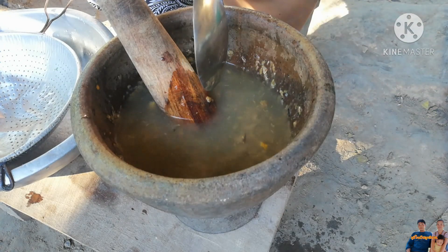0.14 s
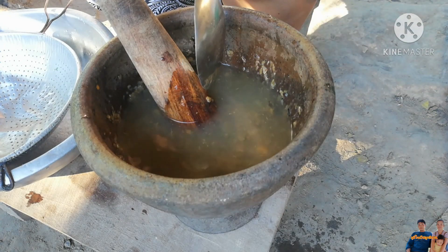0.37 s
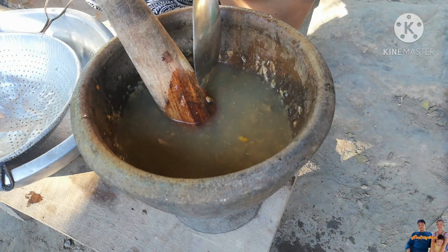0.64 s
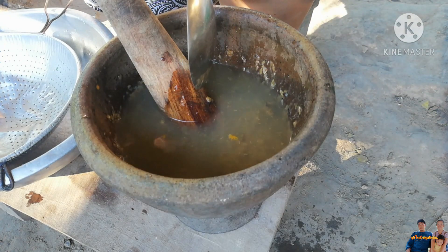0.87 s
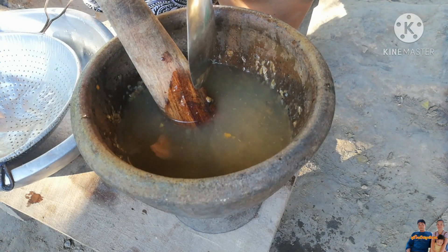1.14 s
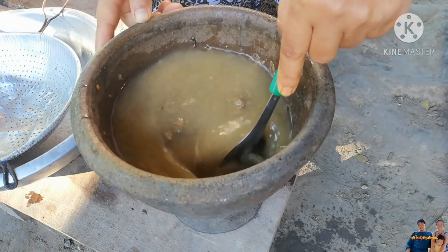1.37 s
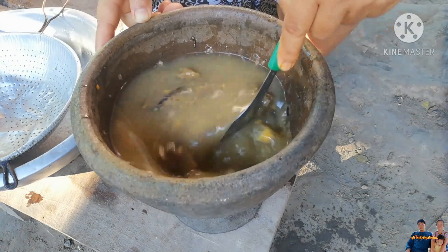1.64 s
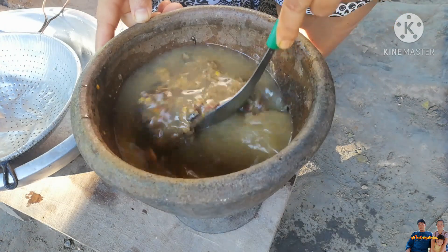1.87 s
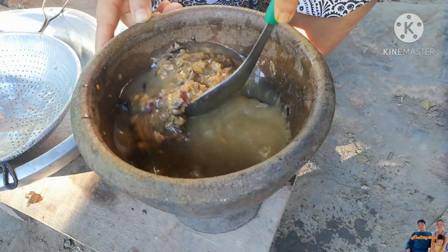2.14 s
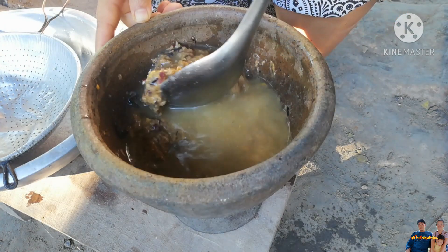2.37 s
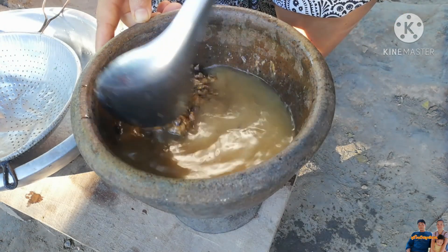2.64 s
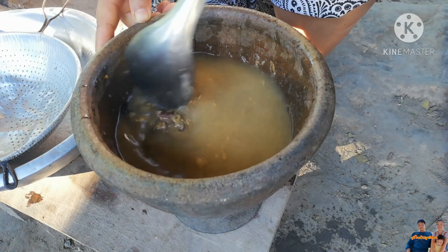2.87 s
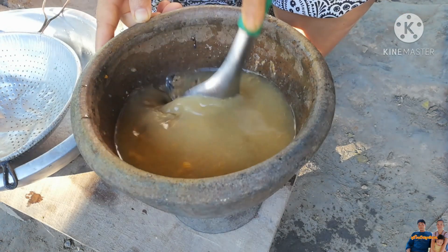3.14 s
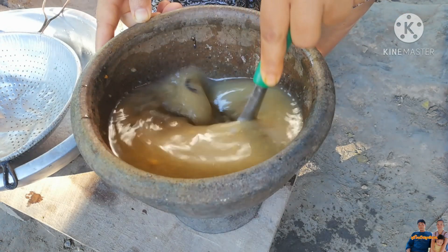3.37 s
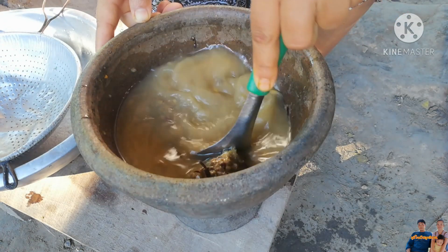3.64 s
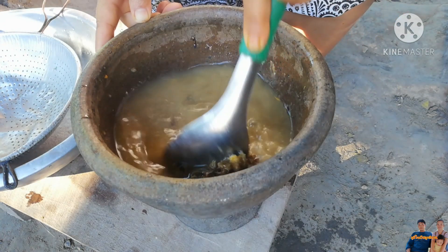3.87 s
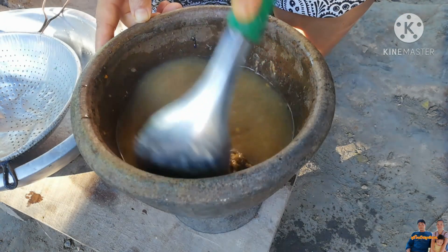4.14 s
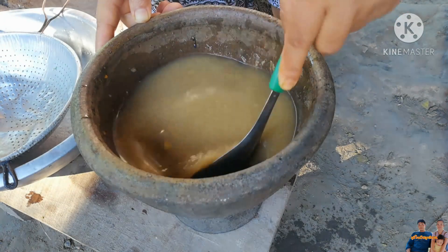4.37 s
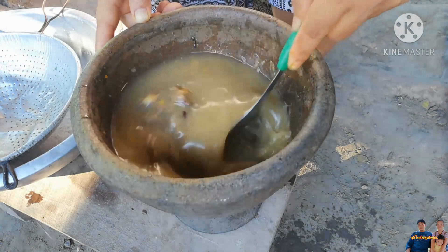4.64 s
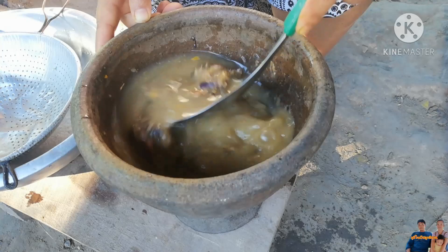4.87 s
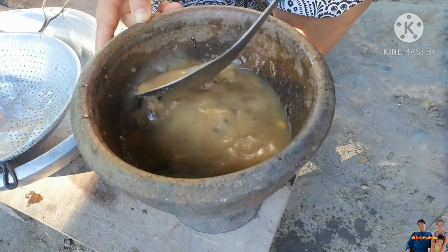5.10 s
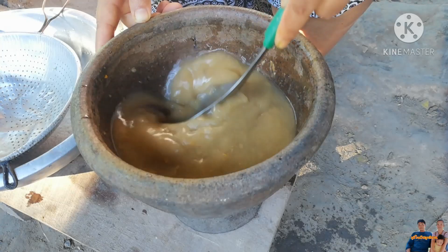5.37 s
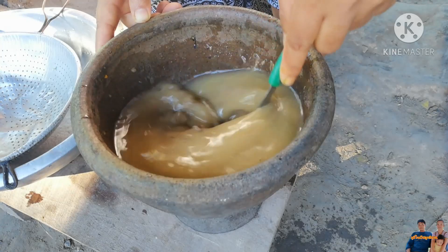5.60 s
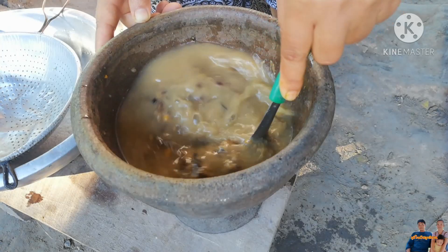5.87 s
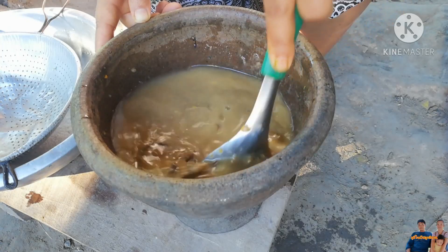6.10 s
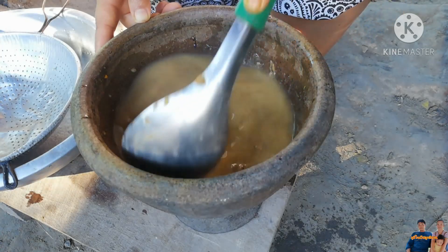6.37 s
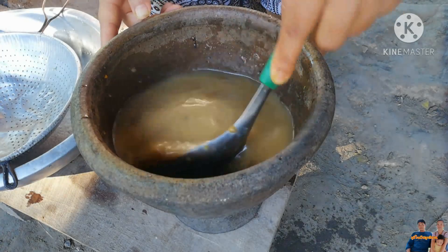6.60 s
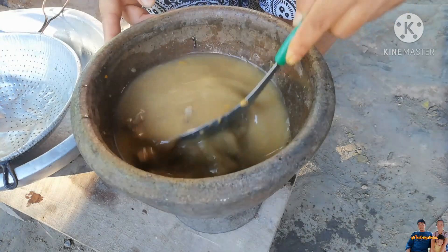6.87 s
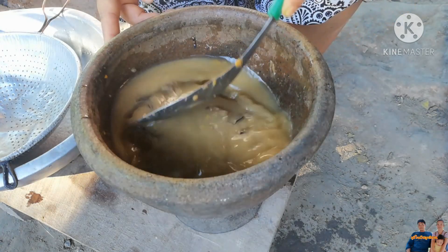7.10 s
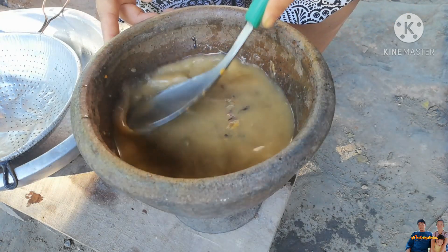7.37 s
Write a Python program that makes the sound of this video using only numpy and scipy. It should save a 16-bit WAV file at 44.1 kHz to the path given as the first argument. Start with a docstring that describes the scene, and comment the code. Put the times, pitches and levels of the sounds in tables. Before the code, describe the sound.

Quiet outdoor hiss and low distant rumble open for about a second. Then a steel spoon begins stirring gritty liquid in a clay mortar: faint rubbing and watery trickles, then a hard bright clink with a cluster of hollow knocks. Irregular scrapes, ticks, plops and gurgles follow in bursts, then thin out. Soft broom-like swishes and a faraway rooster sit behind. Close stereo microphone, dry open yard.

```python
"""Spoon in a clay mortar

A steel spoon stirs gritty liquid in a clay mortar outdoors. Random jolts and noise through the ringing of
clay and steel make it grate; clicks and dying tones make it tick and knock. The liquid plops and drips in
short climbing tones and surges in low noise. Behind it swept noise swishes like a broom, a far cock crows
in wavering tones, a low hum swells once, and shaped noise rumbles and hisses. Two close microphone ports hear it.
"""
import sys
import numpy as np
from scipy import signal
from scipy.fft import rfft, irfft, next_fast_len
from scipy.io import wavfile
from scipy.ndimage import uniform_filter1d, map_coordinates

SR = 44100
rng = np.random.default_rng(int(sys.argv[2]) if len(sys.argv) > 2 else 0)


def makeup_ratio(level_db):
    """Linear amplitude ratio for a level in decibels (20 dB per factor of ten)."""
    decades = np.asarray(level_db, float) / 20
    return 10 ** decades


def dump(signal):
    """Clip the signal to [-1, 1] and save it as 16-bit WAV at the path in sys.argv[1]."""
    limited = np.clip(np.atleast_2d(signal).T, -1, 1)
    pcm = np.round(limited * 32767).astype(np.int16)
    wavfile.write(sys.argv[1], SR, pcm)


N = 330309  # length of the scene in samples


def unit(x):
    """Brings x to rms 1."""
    return x / np.sqrt(np.mean(x ** 2) + 1e-20)


def along(points, hz):
    """Reads a curve of (Hz, value) points on a log frequency axis."""
    point_hz, value = np.transpose(points)
    return np.interp(np.log(hz + 1), np.log(point_hz + 1), value)


def wobble(rate):
    """A smooth random curve with rate knots a second."""
    knots = rng.standard_normal(int(N * rate / SR) + 4)
    return map_coordinates(knots, [np.arange(N) * rate / SR])


def filtered(x, response):
    """Passes x through a filter given as a (complex) function of frequency."""
    m = next_fast_len(N + SR // 4)
    return irfft(rfft(x, m) * response(np.fft.rfftfreq(m, 1 / SR)), m)[..., :N]


def resonances(table):
    """A sum of resonances, each a hump at its own frequency; every second one is turned upside down."""
    def response(hz):
        total = 0
        for k, (center, width, db) in enumerate(table):
            spread = 1j * hz * width
            total = total + (-1) ** k * makeup_ratio(db) * spread / (center * center - hz * hz + spread)
        return total
    return response


def rings(s, db, hz, t60, rise, attack, size):
    """Dying tones, one a row: 60 dB down after t60, by when the pitch has climbed by twice the share rise."""
    t = np.arange(size) / SR
    hz, t60 = hz[:, None], t60[:, None]
    tone = np.sin(2 * np.pi * hz * t * (1 + rise * t / t60))
    wave = tone * makeup_ratio(db[:, None] - 60 * t / t60) * (1 - np.exp(-t / attack))
    at = np.round(s * SR).astype(int)[:, None] + np.arange(size)
    return np.bincount(at.ravel(), wave.ravel(), N + size)[:N]


def glide(rows, shape):
    """Start sample, arched level and sliding pitch of each (s, length s, start Hz, end Hz, dB) row."""
    for s, length, start_hz, end_hz, db in rows:
        u = np.arange(int(length * SR)) / (length * SR)
        yield round(s * SR), makeup_ratio(db) * np.sin(np.pi * u) ** shape, start_hz + (end_hz - start_hz) * u


def tone(hz):
    """A sine that follows a pitch track."""
    return np.sin(2 * np.pi * np.cumsum(hz) / SR)


# strokes along the clay: (time [s], length [s], open wall level [dB], drowned wall level [dB],
# grit level [dB], fall of the grit over the length [dB])
SPOON_STROKES = [(1.168, 0.23, -59, -55, -70, -3), (1.229, 0.051, -54, -64, -51, -1),
                 (1.272, 0.05, -57, -59, -46.5, 12), (1.41, 0.12, -59, -51.5, -55, 3),
                 (1.573, 0.29, -67, -41.5, -88, 20), (2.338, 0.35, -62, -61.5, -78, -30),
                 (2.709, 0.068, -36, -43, -29.5, 30), (2.785, 0.06, -32, -46, -37, -4),
                 (2.817, 0.17, -38.5, -42.5, -31.5, 16.5), (3.066, 0.46, -52, -57.5, -56.5, 9),
                 (3.536, 0.16, -55.5, -63, -59, 11), (3.788, 0.16, -54, -58.5, -61, 27),
                 (4.182, 0.15, -45, -47, -28.5, 19), (4.372, 0.085, -53, -54, -51.5, -4),
                 (4.487, 0.17, -57, -54, -53.5, 2), (4.74, 0.13, -54, -66.5, -49, 10),
                 (5.063, 0.16, -58, -55, -68, 10), (5.293, 0.041, -44.5, -74, -33.5, 20),
                 (5.352, 0.15, -39, -40, -43, -1), (5.53, 0.074, -35, -44.5, -48, -6),
                 (5.63, 0.1, -29, -40, -47, 0.5), (5.767, 0.056, -74, -71, -37.5, 10),
                 (5.81, 0.35, -60, -65, -100, -29), (6.057, 0.24, -58.5, -66, -61, -4.5),
                 (6.369, 0.027, -38, -42.5, -53, 5), (6.472, 0.11, -40, -66, -29, 12.5),
                 (6.597, 0.072, -45.5, -51, -46.5, -6.5), (7.165, 0.024, -65, -78, -48.5, 4),
                 (7.433, 0.09, -54, -54.5, -56, -4)]
# the spoon's edge bounces and chatters over the grit: (time [s], level [dB], time to fall 60 dB [s])
EDGE_CHATTER = [(4.1827, -17, 0.039), (4.1905, -30, 0.014), (4.2006, -15, .04), (4.2085, -27, 0.054),
                (4.2255, -30, .06), (4.238, -36, .08), (4.256, -38, .05), (4.267, -40, 0.045),
                (4.289, -34.5, .1), (4.308, -32, 0.04), (4.326, -57, 0.043), (6.476, -22.5, 0.076),
                (6.4938, -21.5, 0.063), (6.505, -33, 0.054), (6.518, -28, 0.092), (6.54, -36, 0.055),
                (6.552, -45, 0.056), (6.563, -44, 0.04), (6.637, -40, 0.045), (6.646, -47, .05),
                (2.797, -23.5, 0.067), (2.811, -25, .08), (2.8176, -24, 0.041), (2.825, -33, 0.06),
                (2.836, -30, .07), (2.847, -25, 0.096), (2.8726, -32, 0.082), (2.896, -40, 0.046),
                (5.376, -42, .06), (5.455, -35, 0.048), (5.544, -46, 0.052)]
# light touch between strokes: (open wall level [dB], drowned wall level [dB], grit level [dB])
IDLE_TOUCH = (-79, -104, -63)
IDLE_FROM_S = 1.15


def pressure():
    """Gains of open wall, drowned wall and grit: a light idle touch plus every stroke and bounce."""
    bite = np.array([[.12], [.12], [.02]])  # how slowly each swells in, as a share of the stroke length
    lift, ease_db, uneven_db = 0.1, 9.5, 2.5  # lift as a share of the length; the walls ease off on the way
    t = np.arange(N) / SR
    out = makeup_ratio(np.array(IDLE_TOUCH)[:, None] + 0.53 * wobble(7.5)) * (t > IDLE_FROM_S)
    for s, length, wall_db, deep_db, grit_db, fade_db in SPOON_STROKES:
        at = slice(round(s * SR), round((s + 2 * length) * SR))
        u = (t[at] - s) / length
        shape = (1 - np.exp(-u / bite)) * np.exp(-np.maximum(u - 1, 0) / lift)
        level_db = np.array([wall_db - ease_db * u, deep_db - ease_db * u, grit_db - fade_db * u])
        out[:, at] += shape * makeup_ratio(level_db)
    out = out * makeup_ratio(uneven_db * np.array([wobble(25), wobble(25), wobble(25)]))
    for s, db, t60 in EDGE_CHATTER:
        start = round(s * SR)
        u = (t[start:][:SR // 8] - s).clip(0)
        out[2, start:][:len(u)] += makeup_ratio(db - 60 * u / t60) * (1 - np.exp(-u / 0.0006))
    return out


# the spoon's broad ringing: (frequency [Hz], width [Hz], level [dB])
SPOON_RINGING = [(3910, 190, -7.5), (5370, 1300, -2), (6500, 1330, -7), (5880, 86, -18), (6830, 58, -2),
                 (7360, 67, 7.5), (7650, 80, 6), (7970, 110, 6), (8400, 130, 3), (9010, 175, -2),
                 (9220, 81, -1.5), (9860, 350, -4.5), (10680, 200, -8.5), (11550, 90, -9.5),
                 (12960, 82, -9.5)]


def steel(hz):
    """The spoon's resonances over a weak response that fades in the treble."""
    return 0.19 / (1 + 1j * hz / 12000) ** 2 + resonances(SPOON_RINGING)(hz)


# the mortar's ringing, 4 rows drowned part, 5 open wall, 3 rim: (frequency [Hz], width [Hz], level [dB])
MORTAR_RINGING = [(300, 150, -16), (490, 44, 2.5), (650, 170, -1), (800, 235, -2), (1049, 102, 3),
                  (1180, 260, -1.5), (1390, 270, 2.5), (1640, 134, 2.5), (2000, 140, -2), (2600, 390, 1),
                  (2950, 450, 3.5), (3800, 2100, -0.5)]
# color of the grit before the steel: (frequency [Hz], level per Hz [dB])
GRIT_COLOR = [(2060, -19), (3500, -31), (4780, -4), (5190, -12.5), (6700, -1.5), (7560, -4.5),
              (13200, -2.5), (15100, 2), (16000, -31)]
# the spoon moves across the bowl: (time [s], left minus right level [dB])
SPOON_LEAN = [(1.15, 4), (1.56, -1.5), (2.05, 10.5), (2.76, -0.5), (3.8, 3.5), (3.82, 2.5), (4.91, 0),
              (5.02, -1), (5.26, 4.5), (5.279, -8), (5.35, 1), (5.48, 2.5), (6.18, 2.5), (6.32, -1.5),
              (7.1, 3), (7.21, 4), (7.28, 0), (7.49, 0)]


def drag():
    """Grains catch under the spoon some hundreds of times a second; each jolt rings wall and liquid, grit the steel."""
    wall, deep, fine = pressure()
    rim_share = 0.61  # the rim follows the grit by this share, the wall by the rest
    rim = makeup_ratio(-2.5) * fine ** rim_share * wall ** (1 - rim_share)

    catches = (rng.random(N) < 350 / SR) * rng.standard_normal(N) * makeup_ratio(1.6 * wobble(82))
    jolts = catches + 0.2 * rng.standard_normal((2, N))
    scatter = (rng.random((2, N)) < 600 / SR) * rng.standard_normal((2, N))
    scatter = scatter + 0.11 * rng.standard_normal((2, N))

    def clay(gain, source, modes):
        ringing = resonances(modes)
        return filtered(gain * source, ringing) / np.std(filtered(source, ringing))

    bowl = clay(deep, jolts, MORTAR_RINGING[:4]) + clay(wall, jolts, MORTAR_RINGING[4:9])
    bowl = bowl - clay(rim, scatter, MORTAR_RINGING[9:])

    sparks = rng.standard_normal((3, N)) * makeup_ratio(3.5 * wobble(900) + .8 * wobble(150))
    sparks = sparks[0] + 2.8 * sparks[1:]  # one part shared, one part for each port
    grit = unit(filtered(sparks, lambda hz: makeup_ratio(along(GRIT_COLOR, hz)) * np.abs(steel(hz)) ** 1.1))

    lean_db = np.interp(np.arange(N) / SR, *np.transpose(SPOON_LEAN))
    return makeup_ratio(lean_db * [[.5], [-.5]]) * (bowl + grit * fine)


# knocks and slips low in the bowl: (time [s], level [dB], starting pitch [Hz], left minus right level [dB])
BOWL_KNOCKS = [(1.241, -35.5, 2260, -7), (1.611, -33, 485, 1), (1.631, -36.5, 495, 7), (1.658, -36, 493, 0),
               (1.688, -31, 490, 4), (1.719, -42, 520, 1), (1.742, -42, 587, -7), (1.759, -43, 480, -1),
               (1.779, -36, 492, -5), (1.824, -40, 532, -1), (1.879, -48, 558, -11), (2.794, -26, 1380, -1),
               (3.044, -36.5, 1440, 4), (3.201, -42.5, 577, 6), (3.209, -34.5, 1470, 0),
               (3.269, -42, 1500, 4), (3.319, -38, 1050, 5), (3.475, -41.5, 1660, 6), (4.517, -40, 490, 2),
               (4.189, -39, 990, -1), (4.252, -35.5, 970, -1), (5.425, -31.5, 640, -2),
               (5.445, -39, 650, 1), (6.382, -51, 494, -6), (2.7108, -26, 1430, 2), (2.816, -22, 1400, -5),
               (2.831, -28, 1450, 0), (2.852, -15, 1364, 1), (2.858, -16.5, 1390, 3), (2.865, -18, 1360, 1),
               (2.874, -13.5, 1305, 0), (2.885, -20, 1400, -9), (2.9, -18.5, 1390, 7),
               (2.9072, -15.5, 1304, 0), (2.9239, -11, 1390, 2), (2.9359, -17.5, 1330, -1),
               (2.944, -29, 1400, 6), (2.951, -14, 1455, 4), (2.959, -17.5, 1365, 4),
               (2.966, -24.5, 1290, -1), (2.978, -29, 1480, 7), (2.989, -32, 1295, 0),
               (2.994, -30, 1410, 3), (3.19, -40, 1480, 5), (3.241, -36, 1330, 5), (3.307, -35.5, 967, -1),
               (4.185, -21, 2780, 12), (4.202, -31, 2520, 11), (4.235, -35, 924, -3), (4.292, -33, 1630, 3),
               (4.492, -34.5, 2040, 9), (4.771, -36, 1540, 10), (5.298, -23, 1556, -2),
               (5.351, -32.5, 624, 0), (5.375, -36, 655, -3), (5.537, -28, 1430, 0), (5.572, -28, 1270, -1),
               (5.649, -21, 1350, 4), (5.664, -23, 1080, -2), (5.671, -27, 1680, 13), (5.722, -26, 995, 2),
               (7.436, -53, 1640, 10), (5.673, -27, 1400, 4), (5.682, -31, 1650, 2), (5.693, -29, 1310, 8),
               (5.702, -25, 1500, 0), (5.59, -27, 1460, 0), (6.376, -50, 1150, -10), (6.475, -43, 1640, 1)]


def knocks():
    """A tone with two weaker neighbours, lifted in pitch by trapped air; the blow also jolts wall and rim."""
    s, db, hz, pan_db = np.transpose(BOWL_KNOCKS)
    # knocks below 1400 Hz sound from under the liquid: they start softer and last more cycles
    deep = (1400 / hz).clip(1)
    t60 = 27 / hz * deep ** .5  # 27 cycles to die away above the liquid
    rise, attack = 0.06 / deep[:, None], 0.0001 * deep[:, None] ** 3

    def mode(gain_db, ratio, life):
        return np.array([rings(s, db + gain_db + sign * pan_db, ratio * hz, life * t60, rise, attack, size=4000)
                         for sign in (.5, -.5)])

    blows = np.bincount(np.round(s * SR).astype(int), makeup_ratio(db + 11.5 - 6.4 * (deep - 1)), N)
    tones = mode(0, 1.0, 1.0) + mode(-16.5, 1.2, 1.0) + mode(-9 - 8 * (deep - 1), 0.83, 0.9)
    return tones + filtered(blows, resonances(MORTAR_RINGING[4:]))


# sharp contacts of steel on clay: (time [s], level [dB], ping pitch [Hz], left minus right level [dB])
STEEL_TICKS = [(0.888, -29, 7380, 0), (1.238, -32, 7850, -7), (1.277, -31, 7860, -11),
               (1.6614, -34, 2960, -1), (1.8072, -37, 3300, 1), (1.947, -35, 7300, 12),
               (1.4873, -23, 8400, -6), (1.5794, -31.5, 3760, -7), (2.509, -35.5, 7440, -8),
               (2.678, -28.5, 6500, 19), (2.711, -3.5, 8800, -2), (2.824, -12, 8700, -8),
               (2.8744, -14, 8400, 0), (2.9095, -24, 5500, 7), (2.96, -23, 8500, -4),
               (2.9255, -12, 2580, 9), (3.1412, -27, 6660, 13.5), (3.4273, -29.5, 4040, 10),
               (3.441, -38, 4800, -4), (3.505, -36.5, 3970, 7), (3.47, -25, 7160, 3),
               (3.674, -31.5, 7300, 0), (3.5593, -36, 2570, 9), (3.772, -32, 8000, 1),
               (3.823, -33, 7960, 7), (3.8415, -20, 7700, 10), (4.188, -15, 7400, 3),
               (4.5185, -23, 8200, -5), (4.57, -27, 6340, 13), (4.6117, -17, 7100, 1),
               (4.652, -29, 6050, 1), (4.6816, -35, 4760, 10), (4.723, -32, 7750, 2),
               (4.834, -38, 8260, -8), (4.864, -35, 8600, -11), (4.909, -41, 8000, -13),
               (4.9467, -34, 7450, 5), (4.712, -28.5, 8600, -2), (4.76, -33, 7100, 14),
               (4.772, -21.5, 5830, -7), (4.7937, -16.5, 7700, 0), (4.8527, -22, 8900, 5),
               (5.1414, -29, 7000, 8), (5.2978, -12.5, 8000, 8), (5.35, -13.5, 5000, 3),
               (5.3804, -29, 7140, 11), (5.4242, -21, 6130, 2), (5.5733, -21, 7360, 0),
               (5.6485, -27, 3700, -4), (5.758, -29, 4940, -15), (5.7719, -19, 7260, 10),
               (5.793, -22, 6350, 9), (5.8048, -21.5, 7100, -4), (5.97, -36.5, 7540, 13),
               (6.327, -34, 8360, 3), (6.374, -22.5, 8070, -2), (6.478, -26, 8900, -4),
               (5.6195, -22, 6890, 3), (5.632, -20.5, 6270, 1), (5.736, -28, 9100, 10),
               (5.729, -39, 9000, -1), (5.496, -26, 5910, -6), (5.798, -31, 8000, 2), (1.406, -48, 6500, 8),
               (1.4925, -43, 4800, 2), (1.512, -39, 6500, 2), (1.543, -37, 8500, 0), (7.18, -51, 3400, 6),
               (7.188, -31.5, 4000, -9.5), (7.229, -41, 3800, 11), (7.335, -47, 8100, 5),
               (7.344, -50, 7800, 0), (7.46, -37, 7000, 0), (7.486, -34, 5840, 11), (4.543, -28, 9200, 0),
               (4.75, -38, 4500, -2), (6.666, -22, 7360, -1), (6.83, -42, 8500, -4), (6.865, -41, 8300, 4),
               (7.106, -38.5, 7840, 10), (7.425, -33, 7800, 3), (7.173, -42, 7500, -9),
               (7.211, -37, 8700, -21), (7.3985, -37, 8250, 23), (7.446, -34.5, 7470, 15)]


def ticks():
    """Each contact is a click and a short crack through the steel, plus a ping; each port hears another side."""
    s, db, hz, pan_db = np.transpose(STEEL_TICKS)
    ping_t60 = np.full(len(s), 0.0045)  # s
    t = np.arange(600) / SR
    noise = rng.standard_normal((len(s), 3, len(t)))
    at = np.round(s * SR).astype(int)[:, None] + np.arange(len(t))
    out = np.zeros((2, N))
    for side, sign in enumerate((.5, -.5)):
        side_db = db + sign * pan_db
        cracks = (0.35 * noise[:, 2] + noise[:, side]) * makeup_ratio(side_db[:, None] - 60 * t / 0.0051)
        cracks[:, 2 * side] += 1.42 * makeup_ratio(side_db)  # the click, two samples later on the right
        crack = np.bincount(at.ravel(), cracks.ravel(), N + len(t))[:N]
        # the two ports hear the ping 1 % above and 1 % below its pitch
        ping = rings(s, side_db + 0.5, hz * (1 + sign * 0.02), ping_t60, rise=0, attack=0.000078, size=2000)
        out[side] = makeup_ratio(-0.5) * filtered(crack, steel) + ping
    return out


# the liquid heaves against the wall: (time [s], length [s], level [dB])
SLOSH_SURGES = [(1.185, 0.12, -53.5), (2.716, 0.11, -51), (2.796, 0.21, -51), (3.79, 0.25, -51.5),
                (4.2, 0.18, -48.5), (4.497, 0.082, -55), (5.058, 0.13, -63), (6.371, 0.051, -47.5),
                (6.528, 0.1, -55), (7.425, .07, -71)]
# color of the surges: (frequency [Hz], level per Hz [dB])
SLOSH_COLOR = [(140, -2), (220, 6), (330, 7.5), (480, -8.5), (800, -18.5)]


def slosh():
    """Low lumpy surges of liquid: deep noise that swells and sinks, stronger on the left."""
    level = np.zeros(N + SR)
    for s, length, db in SLOSH_SURGES:
        surge = np.sin(np.linspace(0, np.pi, int(length * SR))) ** 0.95
        level[round(s * SR):][:len(surge)] += makeup_ratio(db) * surge
    lumpy = level[:N] * makeup_ratio(1.3 * wobble(30)) * makeup_ratio([[2.5], [-2.5]])
    noise = rng.standard_normal(N) + 0.11 * rng.standard_normal((2, N))
    return lumpy * unit(filtered(noise, lambda hz: makeup_ratio(along(SLOSH_COLOR, hz))))


# single bubbles and plinks: (time [s], length [s], start pitch [Hz], end pitch [Hz], level [dB])
BUBBLES_AND_PLINKS = [(1.43, 0.019, 1100, 1170, -51), (1.458, 0.008, 2720, 2830, -38.5),
                      (1.49, 0.019, 1650, 1720, -47), (4.575, 0.025, 1200, 1310, -48),
                      (4.607, 0.0086, 2920, 3210, -26.5), (5.778, 0.013, 3000, 3500, -34.5),
                      (1.445, 0.0086, 1750, 1900, -47), (1.468, .009, 2120, 2350, -47),
                      (1.472, .009, 2970, 3200, -47), (1.515, 0.0099, 4400, 4700, -42),
                      (1.52, .018, 5400, 5470, -48), (1.534, 0.0088, 4800, 5100, -46),
                      (5.428, 0.017, 3180, 4620, -29.5), (5.405, .016, 2310, 2700, -38),
                      (1.49, 0.038, 960, 1120, -46), (3.595, 0.015, 880, 910, -36.5),
                      (3.635, 0.049, 885, 950, -47), (3.662, 0.028, 915, 1330, -45.5),
                      (3.682, 0.023, 1290, 2000, -52), (4.61, 0.022, 1110, 1260, -35.5),
                      (4.632, 0.013, 794, 850, -39.5), (4.68, 0.026, 920, 1170, -33.5),
                      (4.71, 0.023, 1060, 1230, -41.5), (4.748, 0.0099, 1590, 1700, -42),
                      (4.758, 0.011, 1200, 1360, -34.5), (4.803, 0.014, 1500, 1570, -34.5),
                      (4.826, 0.0082, 640, 680, -44), (4.872, 0.03, 840, 954, -38.5),
                      (5.78, 0.018, 910, 1000, -29.5), (6.762, 0.026, 823, 880, -49.5),
                      (7.434, 0.019, 710, 820, -38.5)]


def bubbles_and_plinks():
    """Bubbles and small bright plinks: short clean tones that climb in pitch as they fade."""
    out = np.zeros(N + SR)
    for start, level, hz in glide(BUBBLES_AND_PLINKS, shape=1.0):
        fading = makeup_ratio(np.linspace(3, -16, len(hz)))
        out[start:start + len(hz)] += level * fading * tone(hz)
    return out[:N]


# swarms of small bubbles behind the spoon: (time [s], length [s], middle pitch [Hz], level [dB])
BUBBLE_SWARMS = [(1.433, 0.22, 1470, -53), (1.603, 0.18, 3300, -70), (3.179, 0.26, 1183, -44),
                 (3.533, 0.14, 1012, -49.5), (4.474, 0.31, 1520, -51.5), (4.7, 0.12, 1850, -48.5),
                 (4.894, 0.35, 850, -66), (5.35, 0.16, 960, -40.5), (5.542, 0.24, 1297, -35.5),
                 (6.028, 0.17, 1120, -58.5), (6.509, 0.14, 850, -52)]


def gurgles():
    """Many small bubbles, each a tone that climbs in pitch and dies away within 28 cycles."""
    count = int(300 * N / SR)  # 300 chances a second; only those that fall within a swarm sound
    when = rng.uniform(0, N / SR, count)
    spread, size, pan = rng.standard_normal((3, count))
    start, length, middle_hz, level_db = np.transpose(BUBBLE_SWARMS)
    swarm = (np.searchsorted(start, when) - 1).clip(0)
    live = (when > start[swarm]) & (when < start[swarm] + length[swarm])
    hz = (middle_hz[swarm] * np.exp(0.333 * spread.clip(-2, 2)))[live]
    db = (level_db[swarm] + 1.3 * size)[live]
    return np.array([rings(when[live], db + sign * 2.2 * pan[live], hz, 28 / hz, rise=0.063, attack=0.0016,
                           size=1800) for sign in (.5, -.5)])


def drips():
    """Tiny droplets crackle on the surface as very short tones, louder while the spoon moves."""
    count = 420
    when, spread = rng.uniform(IDLE_FROM_S, N / SR, count), rng.standard_normal(count)
    size, pan = rng.exponential(1, count), rng.normal(0, 8.4, count)
    start, length, wall_db = np.transpose(SPOON_STROKES)[:3]
    stroke = (np.searchsorted(start, when) - 1).clip(0)
    moving = when < start[stroke] + length[stroke]
    hz = (6500 * np.exp(0.24 * spread)).clip(500, 15000)
    db = -60 + 5 * np.minimum(size, 2) + moving * 0.5 * (wall_db[stroke] + 72).clip(0)
    return np.array([rings(when, db + sign * pan, hz, 12 / hz, rise=0.11, attack=.0001, size=400)
                     for sign in (.5, -.5)])


# swishes, nearly all falling in pitch: (time [s], length [s], start [Hz], end [Hz], level [dB])
BROOM_SWISHES = [(1.583, 0.24, 5050, 4370, -53.5), (1.945, 0.25, 6160, 3600, -47.5),
                 (2.4, 0.63, 5370, 6050, -46.5), (2.99, 0.29, 7800, 5070, -45),
                 (3.438, 0.22, 7460, 5400, -46), (3.851, 0.27, 7900, 5030, -46),
                 (4.46, 0.27, 6500, 4100, -41), (4.963, 0.23, 7600, 5950, -48),
                 (5.989, 0.28, 6900, 3970, -44), (6.772, 0.21, 7360, 5300, -52),
                 (7.187, 0.16, 7400, 5140, -53)]
# where the bristles ring: (frequency [Hz], width [Hz], level [dB])
BRISTLE_RINGING = [(4210, 300, -3), (4760, 26, 2), (5000, 14, -1.5), (5480, 58, -3), (5880, 18, 4),
                   (6340, 86, 4), (6720, 80, 1), (7100, 71, 3)]


def swish():
    """Bristles on concrete: noise in fixed ringing bands; as a swish slides, they speak one after another."""
    noise = rng.standard_normal((3, N))
    ringing = filtered(0.22 * noise[0] + noise[1:], lambda hz: 0.22 + np.abs(resonances(BRISTLE_RINGING)(hz)))
    hz, t, z = signal.stft(ringing, SR, nperseg=512)
    field = uniform_filter1d(rng.standard_normal(z.shape[1:]), 3, 0)
    field = uniform_filter1d(field, 12, 1)  # smooth random patches over pitch and time
    mask = np.zeros(z.shape[1:])
    for s, length, start_hz, end_hz, db in BROOM_SWISHES:
        u = ((t - s) / length).clip(0, 1)
        middle = start_hz + (end_hz - start_hz) * u
        # 0.27: share of the pitch over which the bands speak together
        window = np.exp(-(np.log((hz[:, None] + 1) / middle) / 0.27) ** 2)
        mask += makeup_ratio(db) * np.sin(np.pi * u) ** 0.73 * window
    swept = signal.istft(z * mask * makeup_ratio(4.0 * unit(field)), SR, nperseg=512)[1][:, :N]
    return makeup_ratio(2.5) * swept / np.std(ringing) * makeup_ratio([[1.5], [-1.5]])


# far crowing notes: (time [s], length [s], start pitch [Hz], end pitch [Hz], level before a lift [dB])
CROW_NOTES = [(0, .27, 603, 586, -70.5), (0, 0.21, 1215, 1180, -73), (0, 0.08, 1500, 1510, -71.5),
              (1.65, 0.14, 4600, 4180, -61), (1.7, 0.2, 3040, 2990, -62), (1.91, 0.24, 1940, 1890, -68.5),
              (2.0, 0.18, 3130, 3000, -63), (2.24, 0.16, 1464, 1550, -66.5),
              (2.44, 0.26, 1650, 1640, -57.5), (2.48, 0.13, 833, 800, -63), (4.8, 0.23, 1593, 1554, -62.5),
              (5.36, 0.16, 1657, 1660, -41.5), (5.82, 0.37, 1640, 1582, -58), (1.8, 0.24, 2700, 2660, -70),
              (2.27, 0.48, 2636, 2640, -69), (2.55, 0.1, 2870, 2870, -65), (6.2, 0.12, 1496, 1410, -70)]


def crow():
    """Distance leaves thin, hoarse lines: each note is a wavering tone whose loudness flickers."""
    out = np.zeros(N + SR)
    waver = 1 + 0.022 * wobble(220)
    for start, level, hz in glide(CROW_NOTES, shape=0.22):
        hz = hz * waver[start:start + len(hz)]
        out[start:start + len(hz)] += level * tone(hz)
    hoarse = .75 + .35 * wobble(140) + .25 * np.array([wobble(70), wobble(70)])
    return out[:N] * hoarse * makeup_ratio(4 + 1.2 * wobble(20))


# a low hum: (time [s], length [s], start pitch [Hz], end pitch [Hz], level [dB])
LOW_HUM = [(.55, 0.6, 92, 86.2, -52)]


def hum():
    """A soft low tone that swells once, the same at both ports."""
    out = np.zeros(N + SR)
    for start, level, hz in glide(LOW_HUM, shape=0.54):
        out[start:start + len(hz)] += level * tone(hz)
    return out[:N] * makeup_ratio(2.0 * wobble(14.6))


# color of the yard's noise: (frequency [Hz], level per Hz [dB])
YARD_COLOR = [(18, -47), (32, -11), (52, -2), (90, -8), (145, -11), (194, -22.5), (245, -22), (287, -25.5),
              (394, -30.5), (512, -35), (913, -29), (4530, -36.5), (6900, -32.5), (7870, -24),
              (9220, -41.5), (14400, -46.5), (16000, -35)]
# how alike the two ports hear it: (frequency [Hz], likeness [1 = the same])
PORT_LIKENESS = [(60, .998), (150, .975), (300, .7), (1000, .6), (3000, .2)]


def yard():
    """Distant traffic rumbles, alike at both ports; above 230 Hz a hiss grows ever more different between them."""
    def ports(part):
        def response(hz):
            turn = np.arccos(np.clip(along(PORT_LIKENESS, hz), -1, 1)) / 2
            return part(hz) * makeup_ratio(along(YARD_COLOR, hz)) * [np.cos(turn), np.sin(turn)]
        mid, side = filtered(rng.standard_normal((2, N)), response)
        return unit(np.array([mid + side, mid - side]))

    rumble = makeup_ratio(-55.5 - 2.5 * wobble(4.0)) * ports(lambda hz: hz < 230)
    hiss = makeup_ratio(-59.5 + 0.04 * wobble(0.32)) * ports(lambda hz: hz >= 230)
    return rumble + hiss


# how long the surroundings ring on: (frequency [Hz], time to fall 60 dB [s])
WALL_DECAY = [(300, 0.14), (2000, 0.1), (10000, 0.0035)]


def walls(x):
    """The bowl and the bench around it answer briefly: a tail of dying noise, different at each port."""
    hz, t, z = signal.stft(rng.standard_normal((2, SR // 5)), SR, nperseg=128)
    decay = makeup_ratio(-60 * t / along(WALL_DECAY, hz)[:, None])
    tail = signal.istft(z * decay, SR, nperseg=128)[1]
    return signal.fftconvolve(x, tail / np.linalg.norm(tail[0]), axes=1)[:, :N]


def scene():
    """The mortar is too small to radiate bass; nearer the right port, it reaches the left a moment later."""
    near = drag() + ticks() + knocks() + drips() + bubbles_and_plinks() + gurgles() + slosh()
    near = filtered(near, lambda hz: (1j * hz / (330 + 1j * hz)) ** 2)
    direct = np.array([np.roll(near[0], 2), near[1]])  # left two samples late
    echo = makeup_ratio(-9) * walls(near)
    return direct + echo + swish() + crow() + hum() + yard()


def top_cut(x):
    """Nothing passes above the cut-off."""
    return signal.sosfilt(signal.butter(12, 16520, fs=SR, output="sos"), x)


def record(dry):
    """The microphone falls away in the treble; everything from 16400 Hz up is removed as well."""
    def treble_loss(hz):
        return 1 / (1 + (1j * hz / 14000) ** 2 + 1.5j * hz / 14000)
    heard = filtered(dry, lambda hz: (hz < 16400) * treble_loss(hz))
    return top_cut(heard)


dry = scene()
out = record(dry)
dump(out)
```